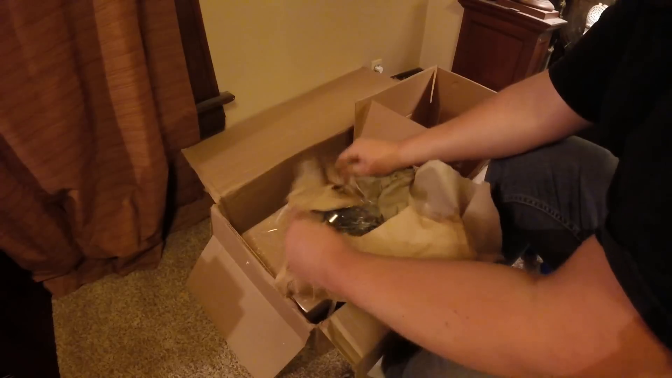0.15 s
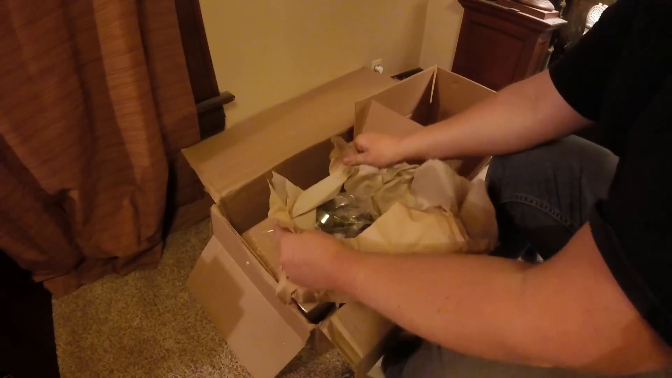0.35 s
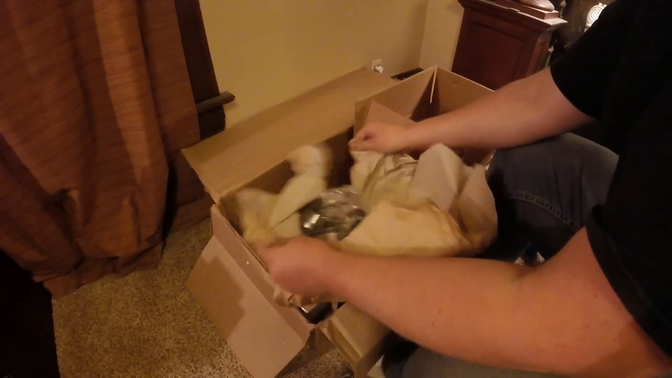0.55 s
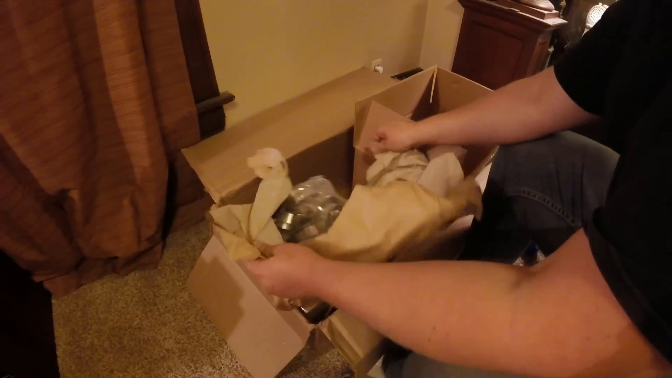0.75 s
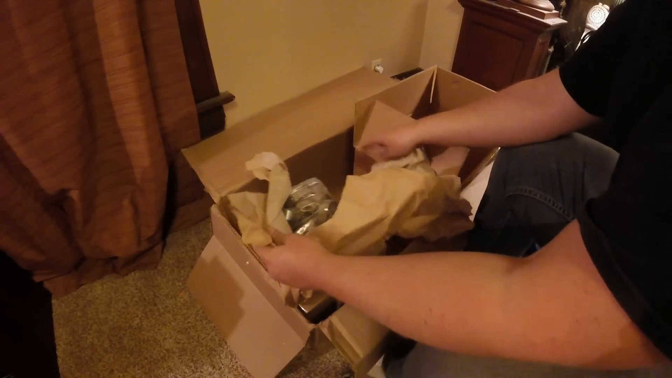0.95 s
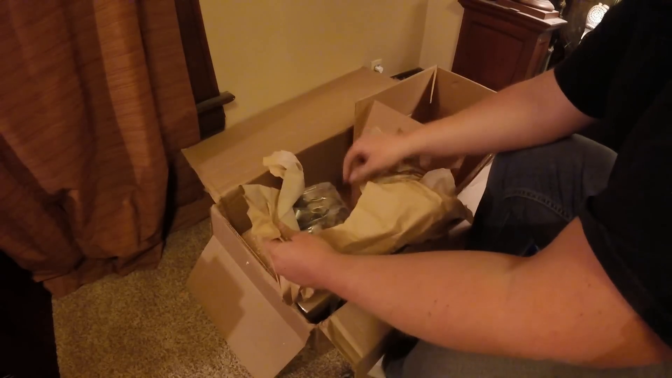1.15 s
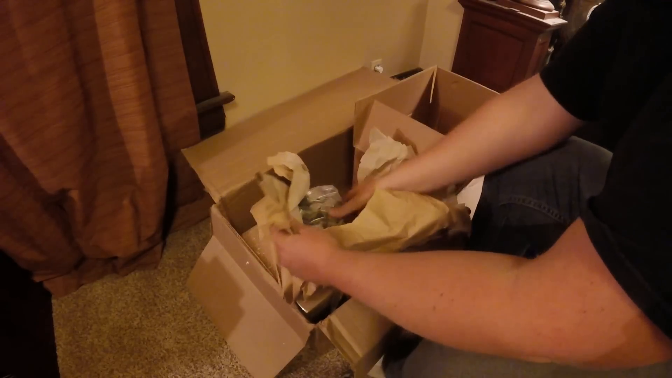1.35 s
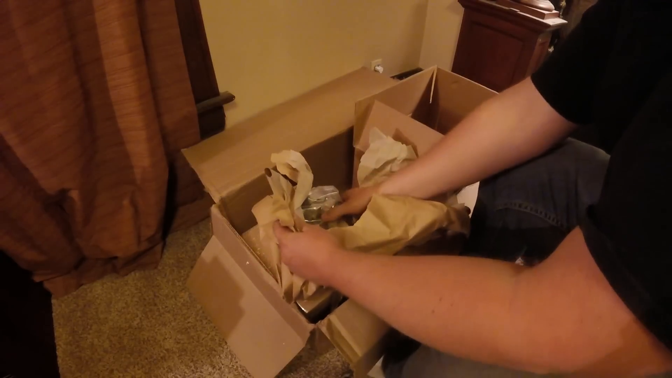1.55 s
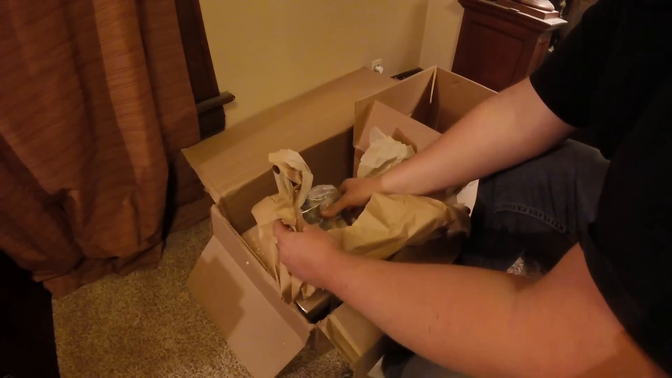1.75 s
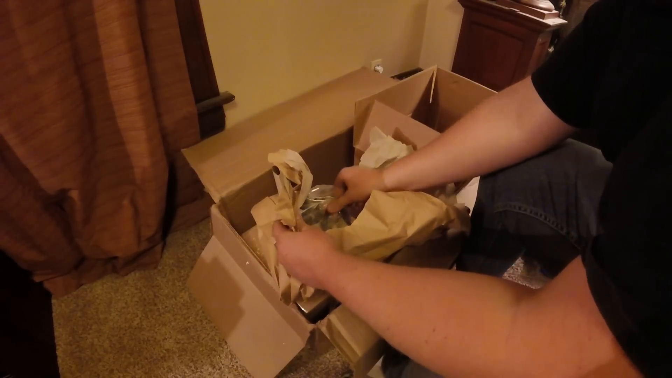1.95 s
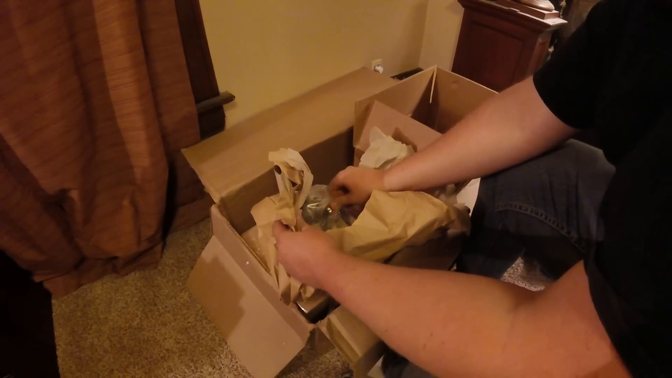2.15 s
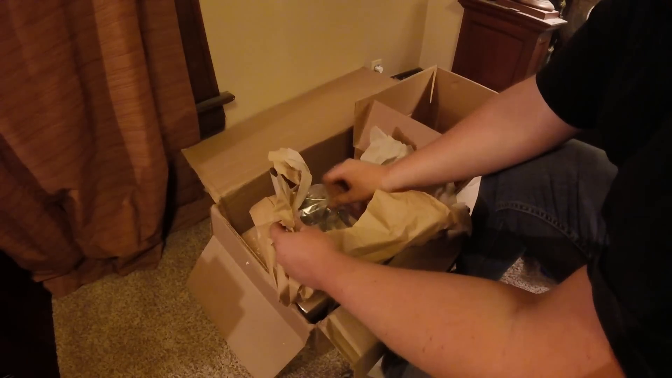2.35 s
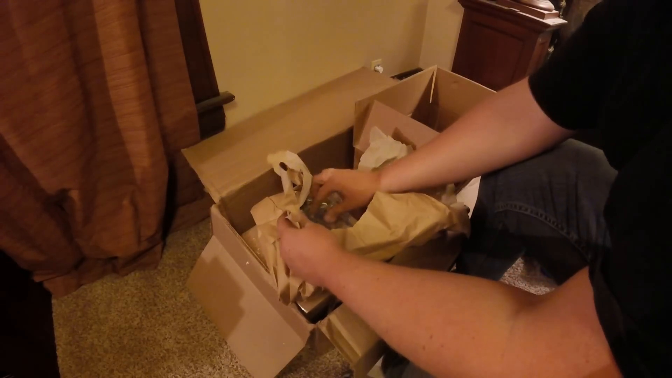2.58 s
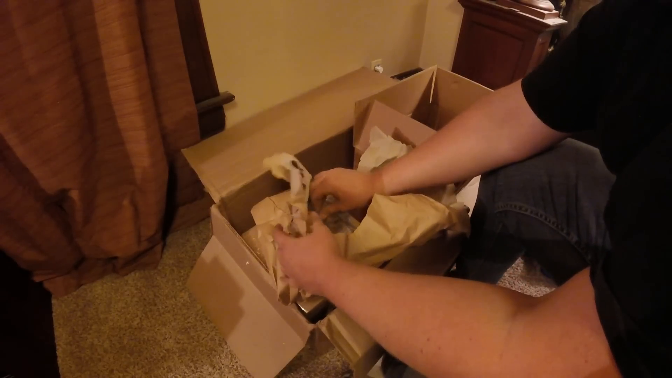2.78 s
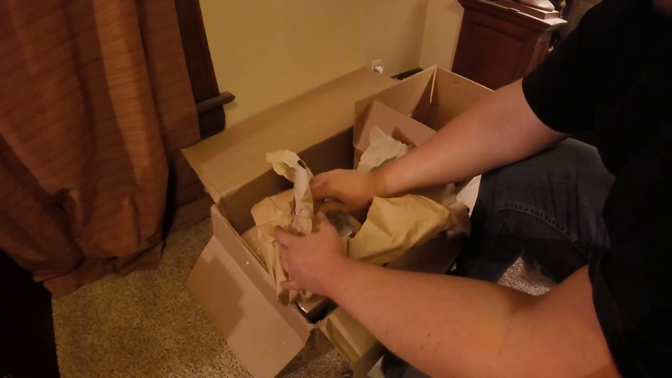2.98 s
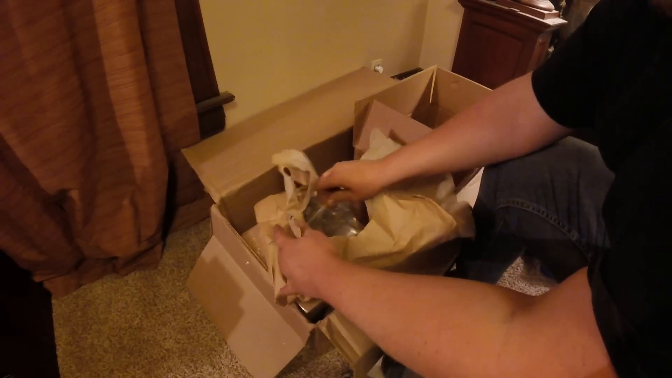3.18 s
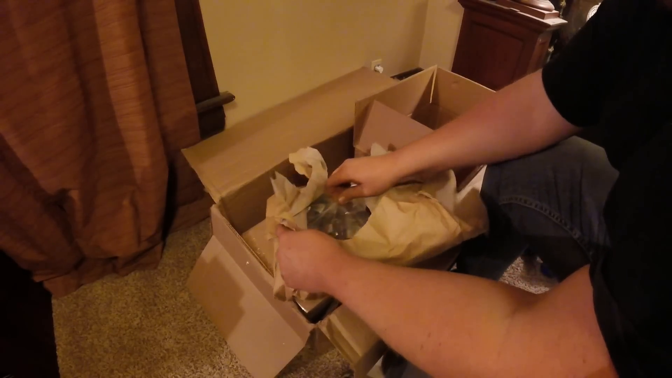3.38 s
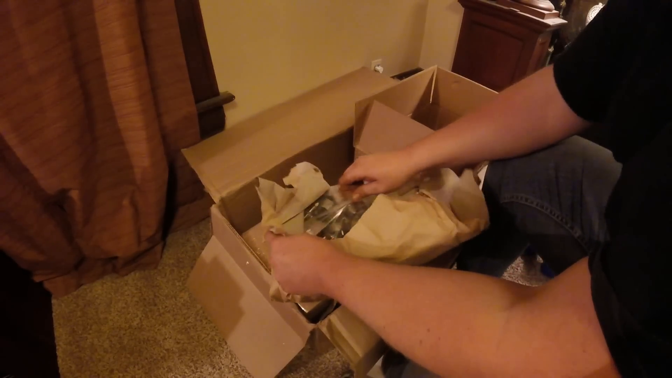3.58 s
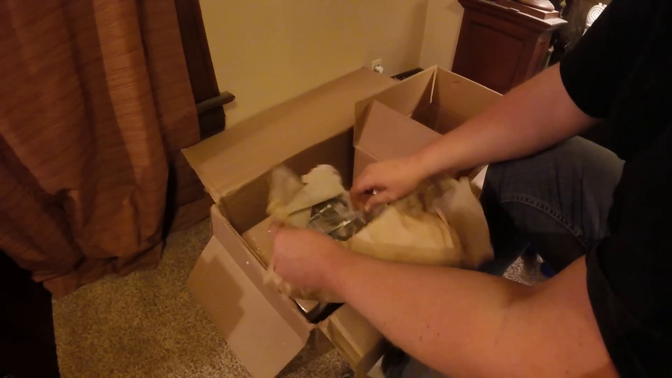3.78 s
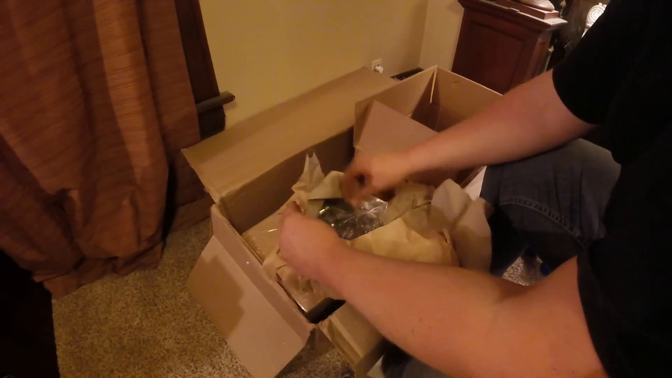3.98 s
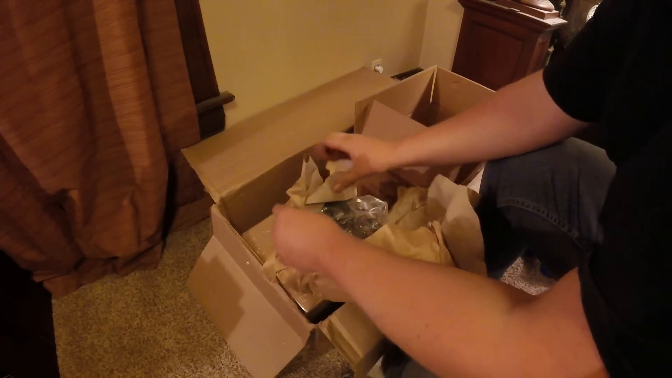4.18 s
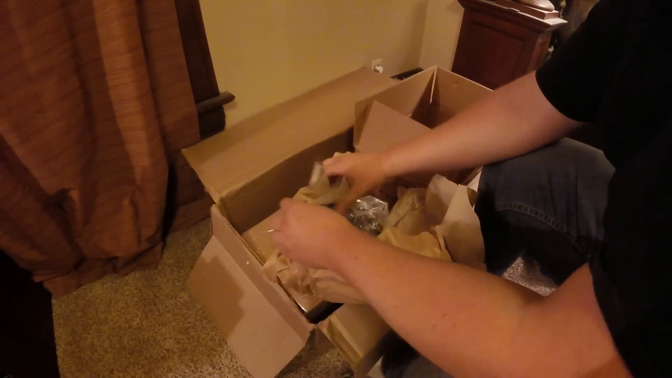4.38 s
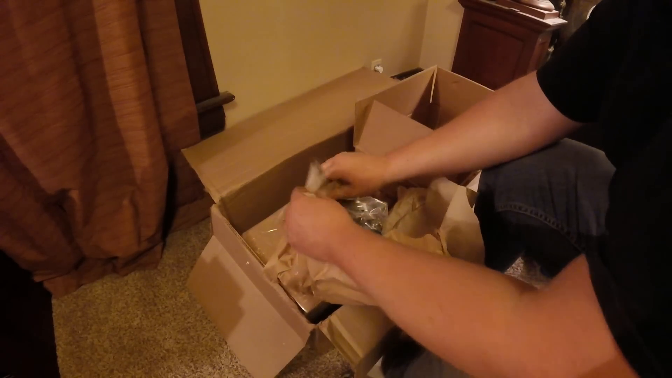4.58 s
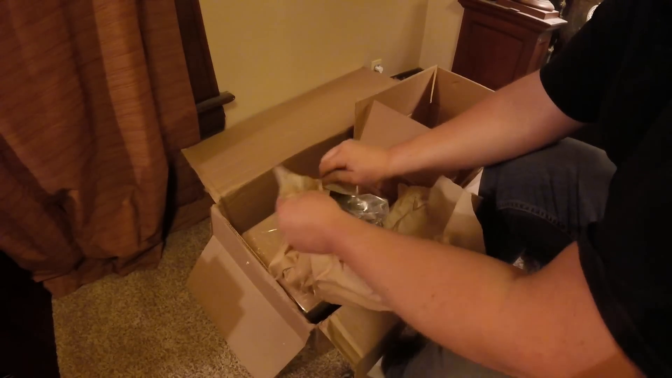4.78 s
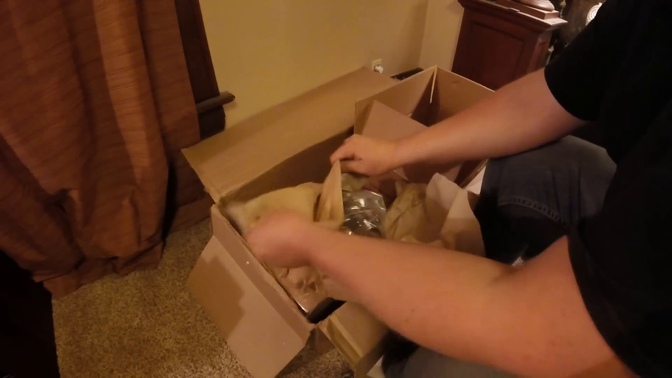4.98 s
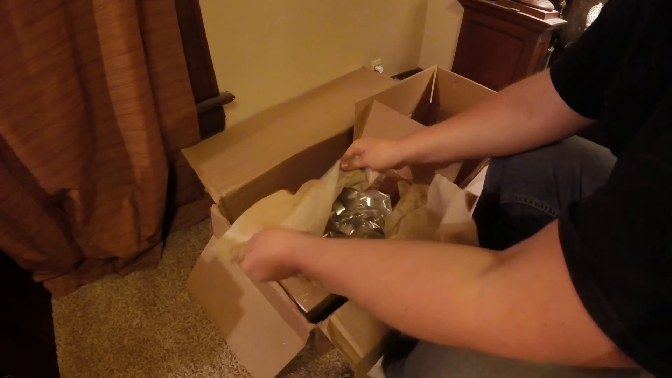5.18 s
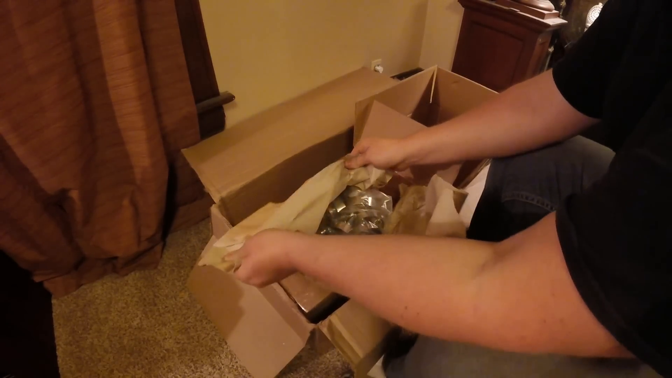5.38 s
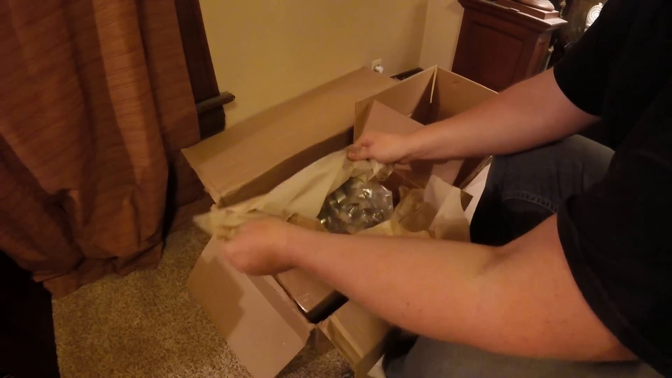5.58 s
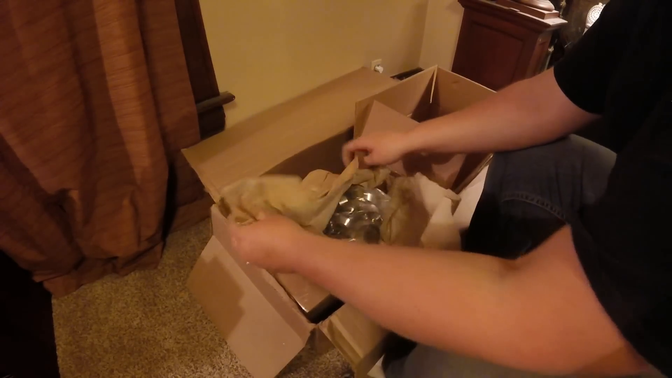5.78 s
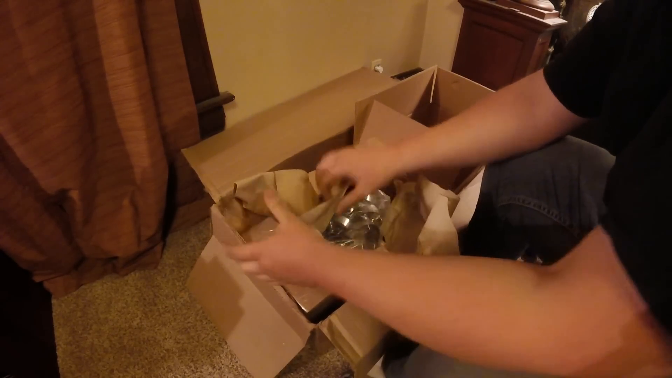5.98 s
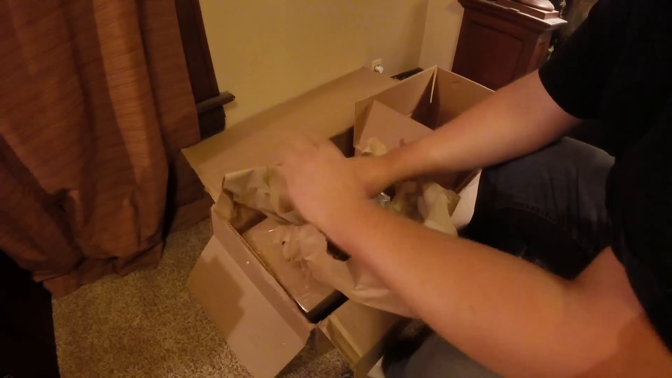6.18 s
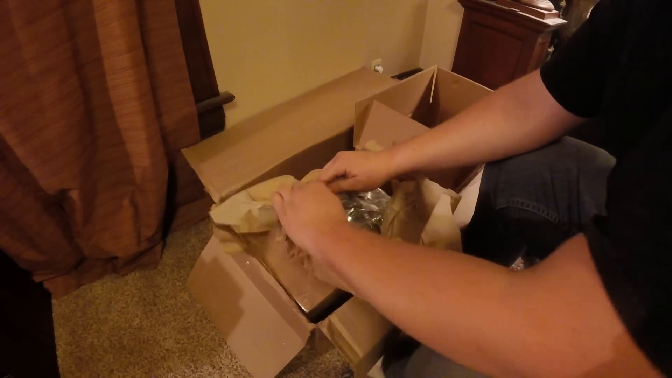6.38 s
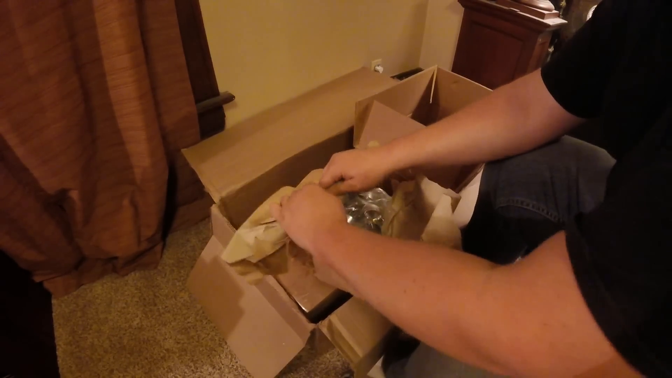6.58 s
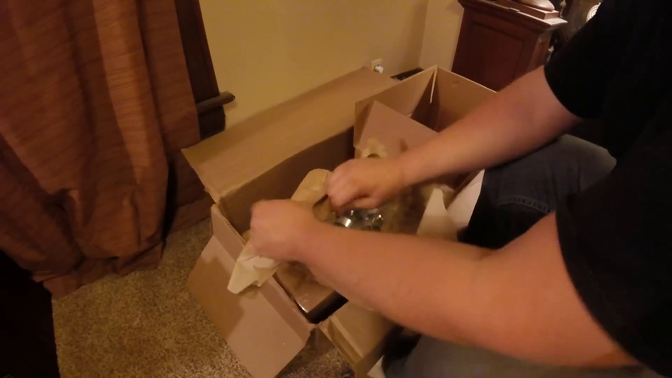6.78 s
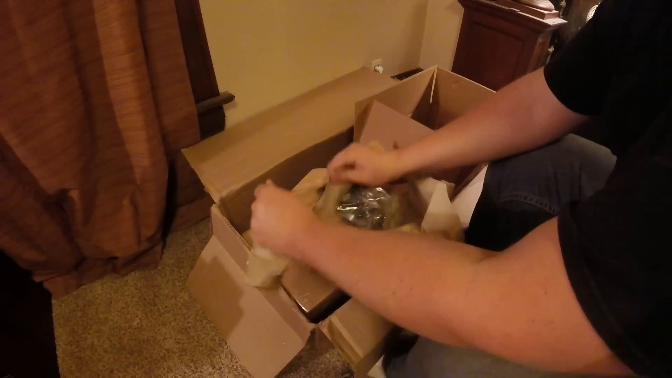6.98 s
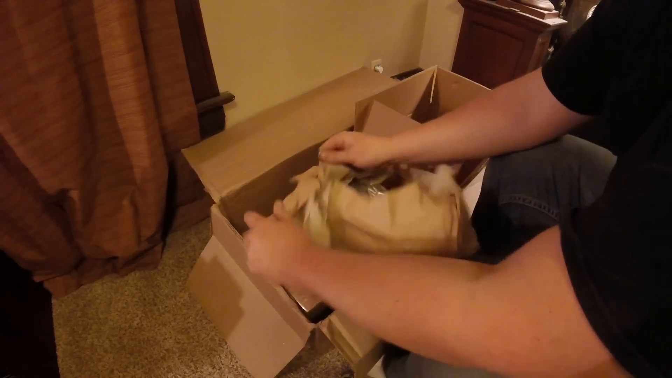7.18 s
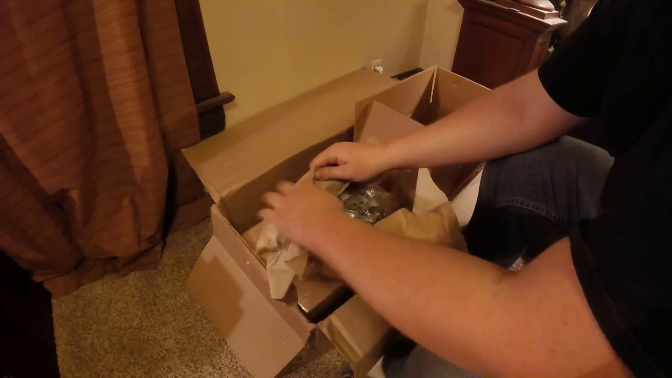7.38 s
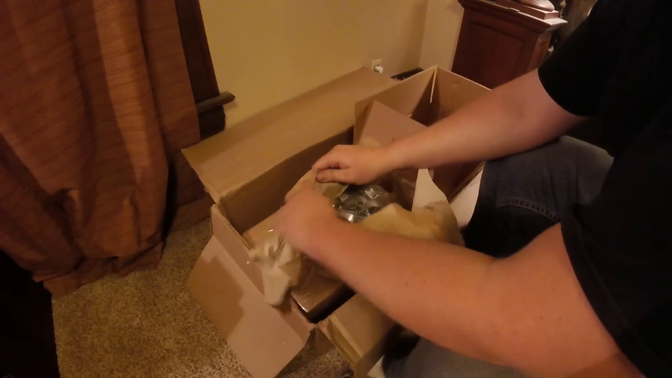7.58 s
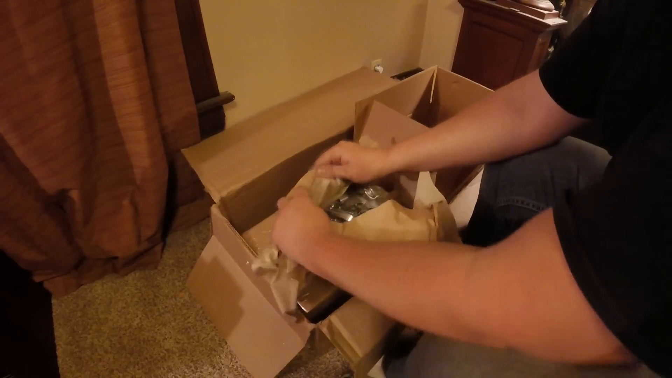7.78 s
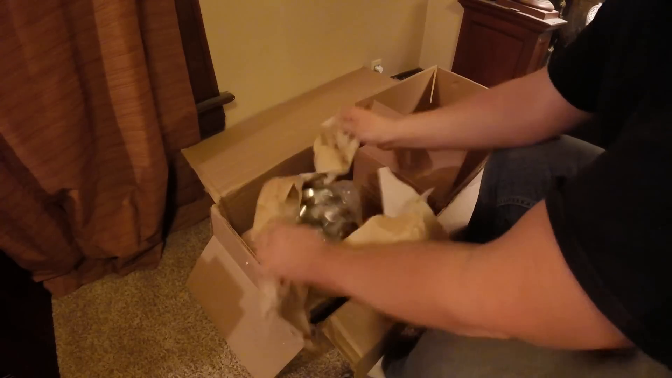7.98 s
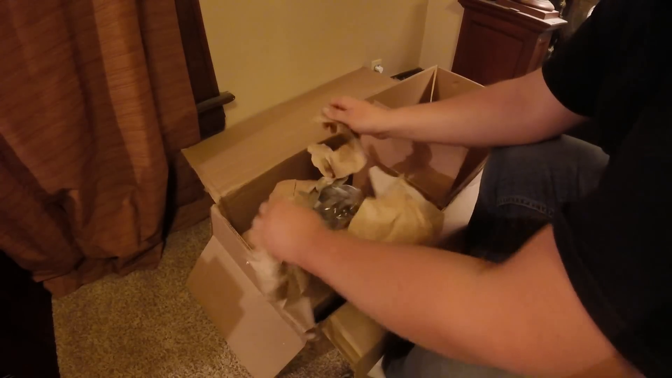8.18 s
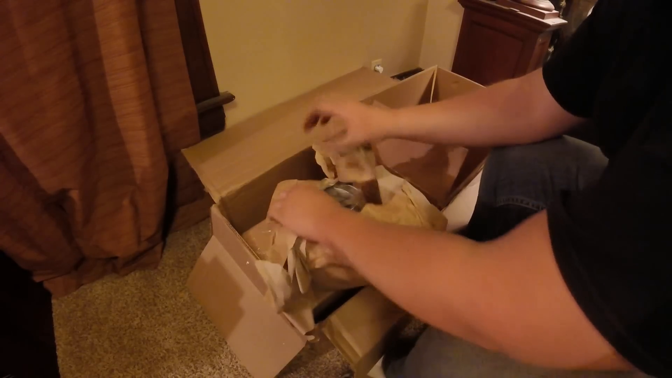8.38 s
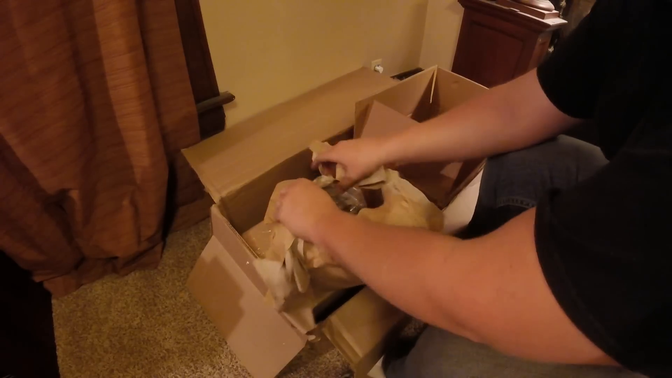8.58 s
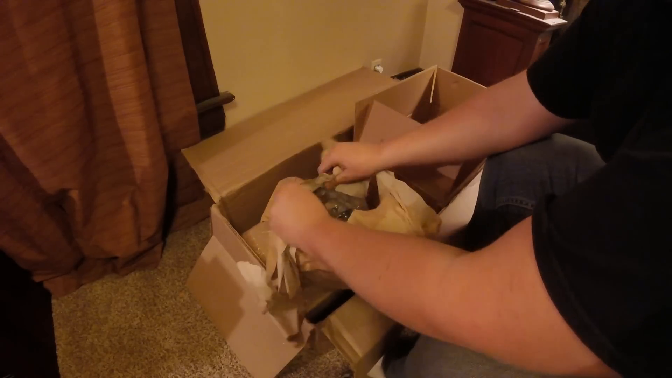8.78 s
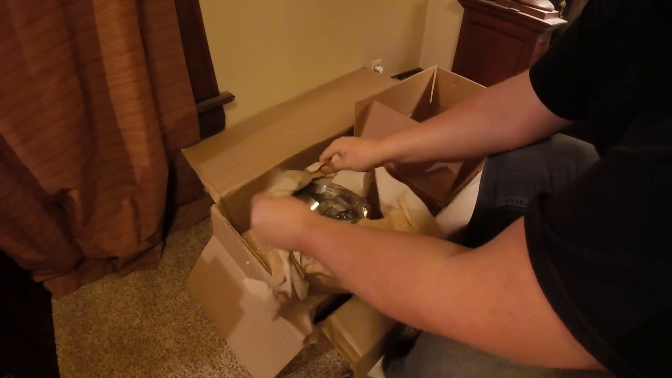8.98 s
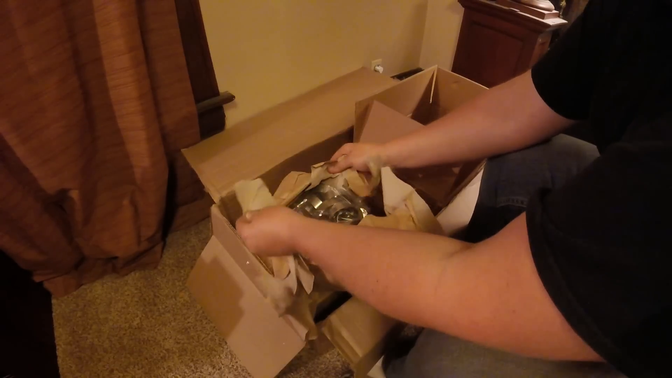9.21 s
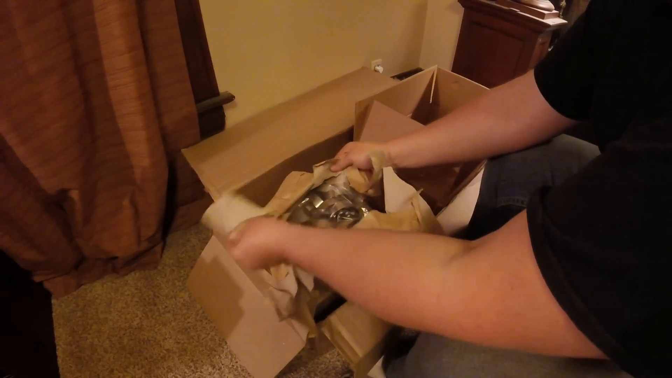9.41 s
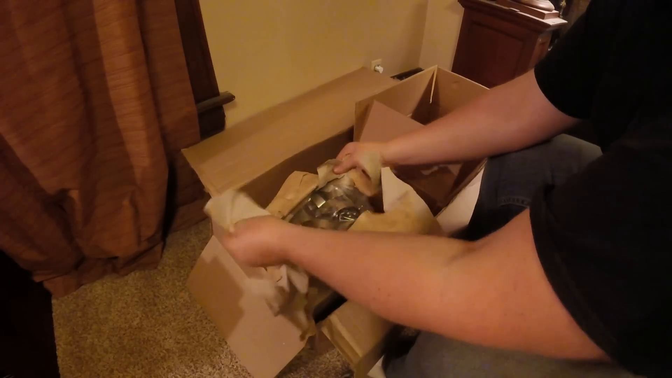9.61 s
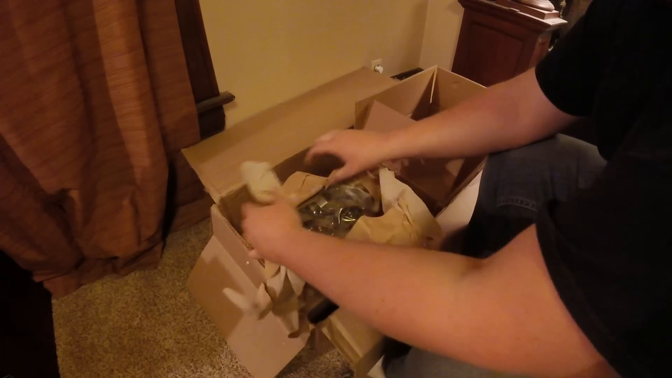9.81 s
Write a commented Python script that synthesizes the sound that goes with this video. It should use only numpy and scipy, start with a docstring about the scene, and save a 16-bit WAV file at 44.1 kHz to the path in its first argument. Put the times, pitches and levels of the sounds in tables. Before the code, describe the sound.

Stiff packing paper is tugged and crumpled inside a cardboard box, with dull buckling pops and crisp crackles over a low, wavering room rumble.

```python
"""Hands pull crumpled kraft paper aside in a cardboard box, close to the microphone.
From the start a low rumble wavers under a faint hush, and swarms of small buckles and creases rustle
with each tug. Soon sharp creases snap as clicks with a spray of noise, and flat panels buckle with
dull decaying pops. Later a few lone crinkles tick as short rings of sagging pitch.
The box rings along with the buckling, and the room answers the paper with fading noise."""
import sys
import numpy as np
from scipy import signal
from scipy.fft import rfft, irfft, next_fast_len
from scipy.io import wavfile
from scipy.ndimage import uniform_filter1d, map_coordinates

SR = 44100
rng = np.random.default_rng(int(sys.argv[2]) if len(sys.argv) > 2 else 0)


def wrap_up_sound(samples):
    """Save the sound to the file named by the first command line argument, as 16-bit audio."""
    columns = np.atleast_2d(samples).T
    # keep every value between -1 and 1, then stretch to whole-number steps
    tamed = np.clip(columns, -1, 1)
    steps = np.round(tamed * 32767).astype(np.int16)
    wavfile.write(sys.argv[1], SR, steps)


N = 434385  # length in samples

# Large panels buckling. Each row: time in seconds, relative level in dB, pitch in Hz.
PANEL_POPS = [(0.093, -2, 262.9), (0.25, -4.5, 434), (0.267, -1, 848.2), (0.302, 4.5, 843.3),
              (0.323, -6.5, 873.1), (0.53, -8, 773.6), (0.653, -3.5, 1035), (0.697, -2.5, 626.9),
              (0.764, -4.5, 928.6), (0.913, -11.5, 902.9), (1.007, -18, 840.4), (1.354, -25, 924.3),
              (1.373, -26, 408.1), (1.698, -21, 445.8), (1.833, -16.5, 947.7), (1.859, -22.5, 888.6),
              (1.888, -18, 916.8), (1.938, -27, 945.6), (2.054, -19.5, 886.6), (2.147, -16, 881.9),
              (2.154, -17.5, 906), (2.285, -30, 936), (2.54, -24, 463.4), (2.58, -22.5, 941),
              (2.628, -22, 420.9), (2.826, -12.5, 1169), (2.849, -14.5, 944.5), (2.943, -12, 958.3),
              (2.966, -10, 467), (3.033, -24, 494), (3.066, -5.5, 482.9), (3.15, -17.5, 866.9),
              (3.289, -18, 982), (3.417, -15.5, 972.3), (3.434, -19.5, 978.8), (3.559, -8, 586.2),
              (3.645, -6.5, 1039), (3.729, -19.5, 372.6), (3.929, -8.5, 999.7), (3.984, -6.5, 958.4),
              (4.252, -19.5, 902.8), (4.399, -15.5, 703.1), (4.568, -19.5, 951.8), (4.616, -16.5, 996.3),
              (4.663, -16, 758.9), (4.766, -6, 846.6), (4.79, -12.5, 888.7), (4.926, -9.5, 436.9),
              (4.95, -2, 865.6), (4.964, -7, 983.7), (4.995, -4.5, 852.1), (5.031, -7, 915.6),
              (5.051, -6, 1001), (5.142, -5, 962.3), (5.203, -7.5, 858), (5.264, -12, 288.6),
              (5.403, -8, 849.5), (5.478, -17, 775.3), (5.492, -14, 885.2), (5.538, -2.5, 858.9),
              (5.568, -12, 636.1), (5.67, -12.5, 1143), (5.798, -7.5, 295.1), (5.864, -10.5, 561.2),
              (5.973, -19.5, 673.6), (6.16, -10, 419.3), (6.399, -18, 692.3), (6.43, -10.5, 717.8),
              (6.496, -13.5, 479.6), (6.607, -13.5, 755.6), (6.648, -17.5, 940.5), (6.676, -20, 422),
              (6.725, -22, 410), (6.773, -0.5, 423.9), (6.798, -7.5, 1082), (6.96, -16, 405.5),
              (7.087, -11.5, 874.6), (7.17, -9, 818.7), (7.199, -7, 855.8), (7.591, -21.5, 482.7),
              (7.68, -12, 830.6), (7.72, 6.5, 1057), (7.886, -10, 754.8), (7.901, -1.5, 504.2),
              (7.997, -14, 1082), (8.046, -5.5, 817.5), (8.157, -3, 276.2), (8.22, -8, 878.9),
              (8.369, -23, 418.9), (8.606, -17.5, 825.2), (8.739, -7.5, 896.9), (8.768, -10.5, 451.4),
              (8.82, -12.5, 433.1), (8.86, -9, 839.9), (8.878, -12.5, 913), (8.947, -8, 934.4),
              (9.031, -3.5, 844.5), (9.098, -1, 980.1), (9.286, -8, 856.9), (9.454, 4, 808.8)]
# Sharp creases snapping. Each row: time in seconds, relative level in dB, ring of the fold in Hz.
CREASE_SNAPS = [(0.066, -35.5, 3000), (0.095, -25.5, 2070), (0.193, -22, 3470), (0.221, -18.5, 2622),
                (0.243, -12.5, 2424), (0.53, -28.5, 5696), (0.654, -19, 3423), (0.698, -14.5, 2470),
                (0.811, -23.5, 2002), (1.69, -33.5, 3130), (1.861, -34, 3360), (2.056, -37, 2501),
                (2.122, -32, 6004), (2.63, -33.5, 6013), (2.827, -24, 2283), (2.93, -22, 3278),
                (3.067, -29.5, 2404), (3.152, -24.5, 3278), (3.289, -27.5, 2386), (3.553, -22, 3299),
                (3.645, -23.5, 2492), (4.029, -28.5, 3612), (4.25, -26.5, 2405), (4.399, -29, 2381),
                (4.521, -18.5, 3261), (4.693, -22, 3618), (4.928, -20, 2430), (4.947, -13.5, 2166),
                (5.141, -10, 2413), (5.202, -16, 3019), (5.404, -19, 2972), (5.478, -23, 2402),
                (5.543, -13.5, 2357), (5.642, -18, 2199), (5.802, -25, 3072), (6.157, -15.5, 2363),
                (6.325, -30.5, 2999), (6.344, -21, 2333), (6.497, -17, 3363), (6.619, -24.5, 3184),
                (6.648, -21.5, 2169), (6.738, -27, 4019), (6.775, -22, 3334), (6.797, -13, 2258),
                (6.996, -22.5, 2190), (7.009, -17.5, 3194), (7.215, -18.5, 3589), (7.577, -28, 2266),
                (7.648, -27, 2409), (7.696, -20.5, 2374), (7.72, -18.5, 2113), (7.842, -27, 3630),
                (7.888, -21, 3788), (7.904, -7, 2667), (8.74, -19, 3460), (8.948, -27, 2400),
                (8.98, -21.5, 2403), (9.099, -12.5, 2408), (9.454, -22, 1879)]
# Tone of buckling panels. Each row: frequency in Hz, relative level in dB.
BUCKLE_TONE = [(150, -29), (300, -5), (650, -4.5), (900, 0.5), (1150, -11.5), (1500, -13), (1900, -25.5),
               (4000, -50.5), (9000, -120)]
# Tone of creasing folds. Each row: frequency in Hz, relative level in dB.
CREASE_TONE = [(1000, -3), (1550, -1.5), (1900, -10), (2450, -4), (2900, -7.5), (3500, -4.5), (4500, -9),
               (6700, -6), (8000, -16.5), (12000, -25), (13500, -32), (15000, -50.5), (16400, -69.5)]


def amp(db):
    """Gain of a level in dB."""
    return 10 ** (np.asarray(db) / 20)


def unit(x):
    """x at rms 1."""
    return x / np.sqrt(np.mean(x ** 2) + 1e-20)


def along(points, hz):
    """Rows of frequency and value, read at hz on a log frequency axis."""
    f, value = np.transpose(points)
    return np.interp(np.log(hz + 1), np.log(f + 1), value)


def wobble(rate):
    """A smooth random curve with rate knots a second."""
    knots = rng.standard_normal(int(N * rate / SR) + 4)
    return map_coordinates(knots, [np.arange(N) * rate / SR])


def filtered(x, response):
    """x times a complex response of frequency."""
    size = next_fast_len(N + SR // 2)
    return irfft(rfft(x, size) * response(np.fft.rfftfreq(size, 1 / SR)), size)[..., :N]


def coloured(x, spectrum):
    """x through a minimum-phase filter of the given tone, so that no hit is heard early."""
    size = 4096
    level_db = along(spectrum, np.fft.rfftfreq(size, 1 / SR))
    cepstrum = irfft(np.log(amp(level_db) + 1e-7))
    # fold the cepstrum onto positive time
    cepstrum[1:size // 2] *= 2
    cepstrum[size // 2 + 1:] = 0
    pulse = irfft(np.exp(rfft(cepstrum)))
    return signal.oaconvolve(x, pulse / np.linalg.norm(pulse))[:N]


def background():
    """A low rumble, noise with a random waver and a drawn level, over the faint hush of the room."""
    # Each row: time in seconds, rumble level in dB.
    rumble_levels = [(0.0, -44), (1.18, -36.5), (1.45, -45), (1.7, -35.5), (2.38, -34.5), (3.29, -40.5),
                     (3.43, -36.5), (3.79, -42), (4.06, -32), (4.17, -41.5), (5.73, -49), (5.84, -33.5),
                     (6.2, -46), (7.9, -44), (8.23, -32), (8.47, -40.5), (9.85, -45)]
    # Tone of the rumble. Each row: frequency in Hz, relative level in dB.
    rumble_tone = [(10, 1), (22, 15), (33, 3.5), (50, 4.5), (80, -2), (130, -33), (400, -43), (2000, -86)]
    # Tone of the hush. Each row: frequency in Hz, relative level in dB.
    hush_tone = [(100, 9.5), (900, -5.5), (1800, -17), (6700, -21), (12000, -33.5), (14000, -62),
                 (15000, -120)]
    waver = amp(1.82 * wobble(6.8))
    rumble = unit(waver * coloured(rng.standard_normal(N), rumble_tone))
    level_db = np.interp(np.arange(N) / SR, *np.transpose(rumble_levels))
    hush = coloured(rng.standard_normal(N), hush_tone)
    return amp(level_db) * rumble + amp(-44.5) * hush


def hands():
    """Gains of buckling, creasing and flap: every tug rises, holds and falls, and their powers add."""
    # Tugs at the paper. Each row: time of full strength in seconds, rise in seconds per 20 dB,
    # hold in seconds, fall in seconds per 20 dB (rise and fall of the buckling, signs ignored),
    # buckling level in dB, creasing relative to it in dB, flap relative to it in dB.
    tugs = [(0.0, .05, 0.00254, 0.4105, -32, -7.5, 0), (0.127, -0.5, 0.01654, 0.73, -29.5, -8.5, -1.5),
            (0.281, 0.0037, 0.013855, 0.1088, -12.5, -12, -3), (0.54, 0.15, 0.0649, 0.5, -32, -8, 0.5),
            (0.712, 0.1614, 0.0106, 0.3086, -18, -10, -5.5),
            (1.15, 0.1037, 0.01231, 0.037, -32.5, -11.5, 1.5),
            (1.338, 0.1279, 0.1641, 0.814, -40.5, -15.5, -6.5),
            (1.668, -0.0333, 0.24907, 0.22, -41.5, -13, -3.5),
            (2.044, -0.0027, 0.0585, 0.86, -45, -10.5, -1.5),
            (2.607, 0.2947, 0.1583, 0.5254, -40, -12.5, -6),
            (2.83, 0.0052, 0.01243, 0.0568, -31, -10.5, -13.5),
            (2.943, 0.1659, 0.02185, 1.8018, -42.5, -12.5, -5.5),
            (3.131, 0.015, 0.1023, .5, -33.5, -12.5, -8.5), (3.385, 0.528, 0.02042, 0.5, -35, -10.5, -8.5),
            (3.548, -0.081, 0.01266, 0.2889, -26.5, -14, -7.5),
            (4.017, 0.2224, 0.0087, 0.1029, -24.5, -12, -2),
            (4.186, 0.1428, 0.05048, 0.1262, -35.5, -7.5, -7.5),
            (4.499, -0.0649, 0.2442, 0.6162, -35, -13.5, -11.5),
            (4.98, .5, 0.07445, 0.7164, -26.5, -5, -5.5), (5.283, .5, 0.3082, 0.4362, -29.5, -10, -6.5),
            (5.812, -0.1333, 0.00599, 0.0943, -22.5, -9.5, -0.5), (5.994, 3, 0.00904, 0.182, -41, -5.5, 4),
            (6.167, 0.0661, 0.002964, 0.05, -26, -13, -17.5),
            (6.333, -0.0174, 0.08527, 0.1621, -31, -8.5, -8),
            (6.502, 0.0913, 0.01385, 0.0951, -31, -9, -18.5),
            (6.614, 0.2677, 0.123, 0.6886, -35, -13.5, -14.5),
            (6.784, 0.0133, 0.08367, 0.0293, -22, -6, -12), (7.1, 0.1794, 0.01963, 0.3499, -22.5, -6.5, -9),
            (7.677, 0.1352, 0.0499, 0.4944, -31.5, -11, -17),
            (7.906, 0.0075, 0.06233, 0.1543, -19, -3.5, -7),
            (8.076, 0.2447, 0.10947, 0.1433, -20.5, -11, -8.5),
            (8.667, 0.2473, 0.01274, 0.5036, -40.5, -6.5, -6.5),
            (8.742, 0.0144, 0.02543, 0.1067, -24, -16, -13),
            (9.096, 0.3674, 0.00884, 0.2931, -21.5, -8, -11.5),
            (9.465, -0.0138, 0.004456, 0.1085, -22.5, -8.5, -7.5),
            (9.504, 0.1646, 0.01834, 0.0132, -28, -1, -5), (9.769, 0.2036, 0.0842, 0.5, -34, -11, -5.5)]
    # Hands resting on the paper: levels of buckling, creasing and flap in dB.
    idle_db = [-60.5, -68, -66.5]
    crease_swing, flap_swing = 1.1069, 1.2721  # rise and fall in dB, relative to the buckling
    t = np.arange(0, N + 64, 64) / SR
    power = amp(idle_db)[:, None] ** 2
    for s, rise, hold, fall, db, crease_db, flap_db in tugs:
        before = (s - t).clip(0) / abs(rise)
        after = (t - s - abs(hold)).clip(0) / abs(fall)
        under_db = -20 * (before + after)
        buckle_level = db + under_db
        crease_level = db + crease_db + crease_swing * under_db
        flap_level = db + flap_db + flap_swing * under_db
        power = power + amp([buckle_level, crease_level, flap_level]) ** 2
    return [np.interp(np.arange(N) / SR, t, gain) for gain in np.sqrt(power)]


def slips(per_s, spread_db, t60, steady):
    """Gain of a sheet that sticks and lets go: sudden jumps at random moments, each dying away."""
    jumps = (rng.random(N) < per_s / SR) * amp(spread_db * rng.standard_normal(N))
    t = np.arange(SR // 4) / SR
    decay = amp(-60 * t / t60) * (1 - np.exp(-t * 700))
    gain = steady + signal.oaconvolve(jumps, decay)[:N]
    return gain / uniform_filter1d(gain, size=SR // 10)  # leaves the slow level to the hands


def swarm(per_s, spread_db, smooth):
    """Random clicks of very uneven size over a share of smooth rubbing noise; rms 1."""
    hits = rng.random(N) < per_s / SR
    sizes = amp(spread_db * rng.exponential(size=N).clip(0, 3))
    clicks = hits * sizes * np.sign(rng.standard_normal(N))
    return unit(unit(clicks) + smooth * rng.standard_normal(N))


def crinkle_swarm(count, hz, octaves, cycles, spread_db):
    """Tiny creases, each a damped ring of a few cycles at its own pitch and size; rms 1."""
    when, pitch, size = rng.random(count), rng.standard_normal(count), rng.exponential(size=count)
    f = np.clip(hz * 2 ** (octaves * pitch), 800, 14000)[:, None]
    k = np.arange(192)  # samples of each ring
    sizes = amp(spread_db * size.clip(0, 4))[:, None]
    rings = sizes * np.sin(2 * np.pi * f * k / SR) * np.exp(-f * k / SR / cycles)
    places = (when * N).astype(int)[:, None] + k
    return unit(np.bincount(places.ravel(), rings.ravel(), minlength=N)[:N])


def box(x):
    """The cardboard walls add their resonant modes to whatever moves inside."""
    # Modes of the walls. Each row: frequency in Hz, width in Hz, level in dB.
    box_modes = [(185.04, 170.1, -7), (229.56, 23.04, 2), (260.46, 16.6, -8), (433.75, 61.31, 7),
                 (650.91, 15.785, -1.5), (868.31, 63.6, 5.5), (993.13, 25.06, 6), (1091.3, 60.5, 8)]

    def ringing(f):
        """Sum of the modes, with alternating sign."""
        total = 0
        for k, (centre, width, db) in enumerate(box_modes):
            damping = 1j * f * width
            total = total + (-1) ** k * amp(db) * damping / (centre * centre - f * f + damping)
        return total

    return 0.701 * x + filtered(x, ringing)


def settling(t60):
    """Power of the small buckles that each large pop sets off and that die away after it."""
    after_db, after_grows = -20, 0.7713  # level after a 0 dB pop; dB more for each dB of pop
    power, t = np.zeros(N + SR), np.arange(SR // 2) / SR
    fade = (amp(-60 * t / t60) * (1 - np.exp(-t / 0.000401))) ** 2
    for s, db, _ in PANEL_POPS:
        power[round((s + .002) * SR):][:len(t)] += amp(after_db + after_grows * db) ** 2 * fade
    return power[:N]


def bracing(events, depth, lead_s):
    """Gain of a sheet that stiffens and falls quiet just before it gives way."""
    gain, t = np.ones(N + SR), np.arange(SR // 10) / SR
    dip = (1 - depth * np.exp(-t / lead_s))[::-1]
    for s, *_ in events:
        start = round(s * SR)
        gain[start:start + len(t)] *= dip
    return gain[len(t):][:N]  # shifted so that each dip ends at its event


def rustle():
    """Countless small buckles and creases follow the hands and share their slips with the flapping sheet."""
    # Tone of the flapping sheet. Each row: frequency in Hz, relative level in dB.
    flap_tone = [(40, -31.5), (80, -2), (200, 2.5), (270, 3.5), (400, -31.5), (1500, -79)]
    bright_db, bright_grows = -4.5, 0.6753  # treble in the hardest creasing; dB more per dB of creasing
    buckling, creasing, flapping = hands()
    slip = slips(70, spread_db=2.5, t60=.045, steady=.55)

    buckles = swarm(500, spread_db=2.6, smooth=.2) * slip ** .7
    buckles = box(coloured(buckles, BUCKLE_TONE))

    rubbing = swarm(1600, spread_db=4.5, smooth=.35)
    crinkles = crinkle_swarm(count=4500, hz=3912.3, octaves=0.7618, cycles=2.501, spread_db=2.5)
    creases = coloured((rubbing + .6 * crinkles) * slip ** .8, CREASE_TONE)
    treble = np.diff(creases, 2, prepend=[0, 0])
    hardness = creasing / creasing.max()
    creases = creases + amp(bright_db) * hardness ** bright_grows * treble  # harder is brighter

    flaps = swarm(250, spread_db=2.5, smooth=.6) * slip ** .6
    flaps = box(coloured(flaps, flap_tone))

    buckle_gain = np.sqrt(buckling ** 2 + settling(t60=.11))
    panels = bracing(PANEL_POPS, depth=.7, lead_s=.012)
    folds = bracing(CREASE_SNAPS, depth=.6, lead_s=.015)
    sheet = buckle_gain * unit(buckles) + flapping * unit(flaps)
    return panels * sheet + folds * creasing * unit(creases)


def snaps():
    """A crease gives way: a hard click that rings at the size of the fold, then a spray of fibres tearing."""
    out, t = np.zeros(N + SR), np.arange(SR // 5) / SR
    spray = amp(-60 * t / 0.21) + 0.5114 * amp(-60 * t / 0.00888)
    for s, db, fold_hz in CREASE_SNAPS:
        plain, fold, edge = rng.standard_normal(size=(3, len(t)))
        fold = signal.lfilter(*signal.iirpeak(fold_hz, 4, SR), fold)
        edge = np.diff(np.diff(edge, prepend=0), prepend=0)  # highest treble
        fibres = spray * (0.5084 * plain + 1.3294 * fold + amp(-20.5) * edge)
        ring = amp(-7 - 60 * t / .003) * np.cos(2 * np.pi * fold_hz * t)
        click = ring + amp(-5 - 60 * t / .0004)
        out[round(s * SR):][:len(t)] += amp(db) * (click + amp(-12) * fibres)
    return coloured(out[:N], CREASE_TONE)


def pops():
    """A panel flips over: a few cycles at its own pitch with a second, lower mode, and a knock on the box."""
    out, knocks, t = np.zeros(N + SR), np.zeros(N + SR), np.arange(SR // 5) / SR
    chance = rng.random((len(PANEL_POPS), 2))
    for (s, db, hz), (detune, side) in zip(PANEL_POPS, chance):
        start = round((s + 0.0012168) * SR)  # the panel bends briefly before it flips
        sign = np.sign(side - .5)
        t60 = 0.006228 + 8 / hz  # low panels ring longer
        decay = amp(-60 * t / t60) + 0.04744 * amp(-60 * t / 0.0712)
        shape = decay * (1 - np.exp(-t / 0.00068655)) ** 3
        first = np.sin(2 * np.pi * hz * t)
        second = 0.2803 * np.sin(2 * np.pi * hz * (0.4469 + 0.41693 * detune) * t)
        out[start:][:len(t)] += sign * amp(db + 0.5) * shape * (first + second)
        knocks[start] = sign * amp(db + 2.0)
    return out[:N] + box(coloured(knocks[:N], BUCKLE_TONE))


def lone_ticks():
    """A single small crinkle: a short ring whose pitch sags, with a puff of fibre noise."""
    # Each row: time in seconds, relative level in dB, starting pitch in Hz.
    lone_crinkles = [(2.966, -30, 3520), (4.605, -29, 2608), (4.982, -18.5, 3525), (5.162, -15, 5713),
                     (5.667, -21.5, 3477), (6.063, -36.5, 3328), (6.36, -24, 3304), (6.444, -20, 2903),
                     (6.478, -21.5, 2788), (6.569, -31, 2612)]
    out, t = np.zeros(N + SR), np.arange(SR // 20) / SR
    for s, db, hz in lone_crinkles:
        ring = amp(-60 * t / .009) * np.sin(2 * np.pi * hz * t * (1 - 12 * t))
        puff = .12 * amp(-60 * t / .05) * rng.standard_normal(len(t))
        out[round(s * SR):][:len(t)] += amp(db - 5) * (ring + puff)
    return coloured(out[:N], CREASE_TONE)


def room(x):
    """Diffuse answer: the energy in each band lingers as noise and dies at that band's own speed."""
    # Each row: frequency in Hz, time to fall by 60 dB in seconds.
    decay_times = [(150, 0.1514), (1000, 0.09294), (3000, 0.18745), (8000, 0.2281), (14000, 0.4076)]
    hz, t, bands = signal.stft(x, SR, nperseg=256)
    keep = amp(-120 * t[1] / along(decay_times, hz))  # share of the power left after one frame
    power = np.abs(bands) ** 2
    energy = np.array([signal.lfilter([0, 0, 1 - k], [1, -k], p) for k, p in zip(keep, power)])
    noise = signal.stft(rng.standard_normal(N), SR, nperseg=256)[2]
    noise = noise / np.sqrt(np.mean(np.abs(noise) ** 2))
    return signal.istft(np.sqrt(np.abs(energy)) * noise, SR, nperseg=256)[1][:N]


def scene():
    """Paper, room and background at the single microphone."""
    paper = rustle() + pops() + snaps() + lone_ticks()
    return (paper + amp(-4.5) * room(paper) + background())[None]


def record(dry):
    """The input rounds off the highest peaks; nothing is kept above the band limit."""
    top_hz = 16400
    soft = dry / (1 + np.abs(dry) ** 8) ** (1 / 8)
    return filtered(soft, lambda hz: hz < top_hz)


dry = scene()
out = record(dry)
wrap_up_sound(out)
```